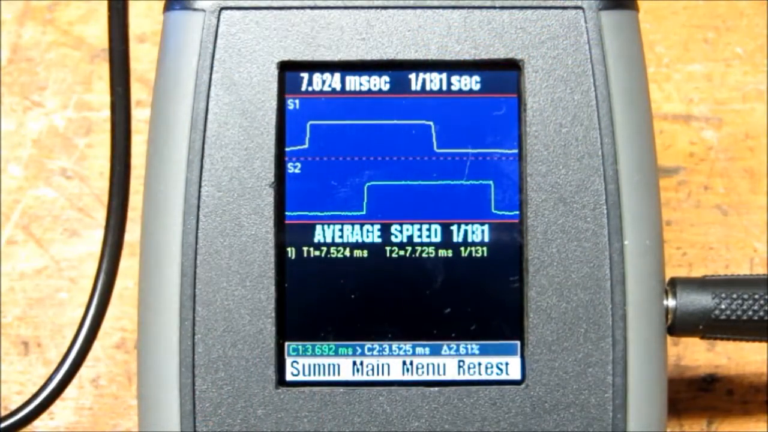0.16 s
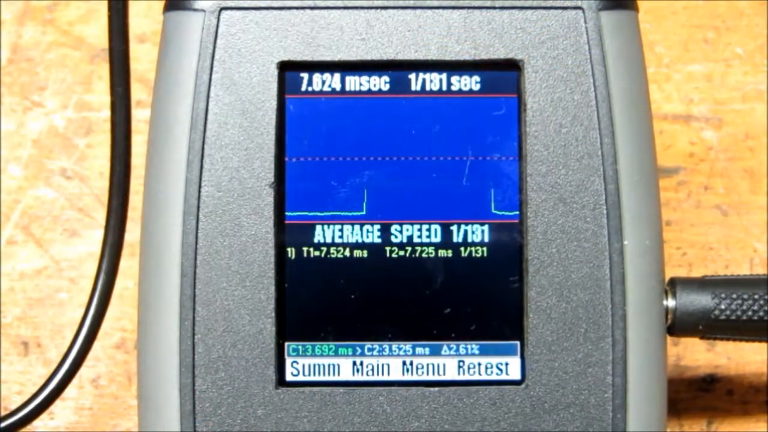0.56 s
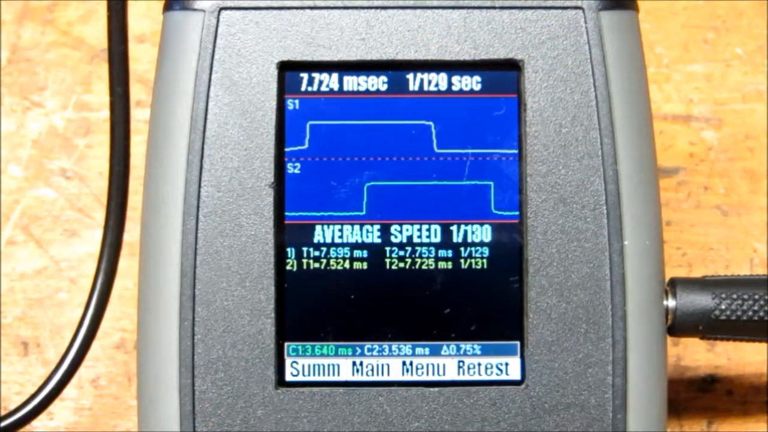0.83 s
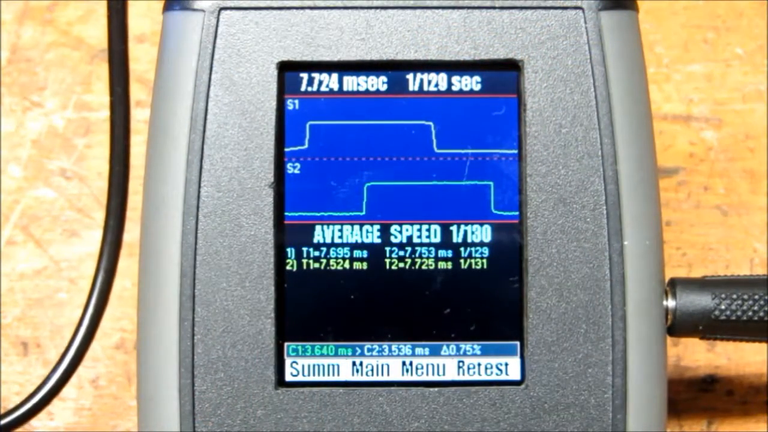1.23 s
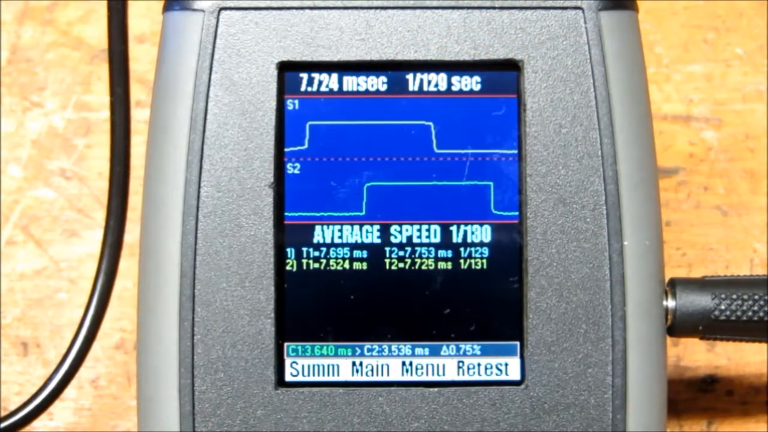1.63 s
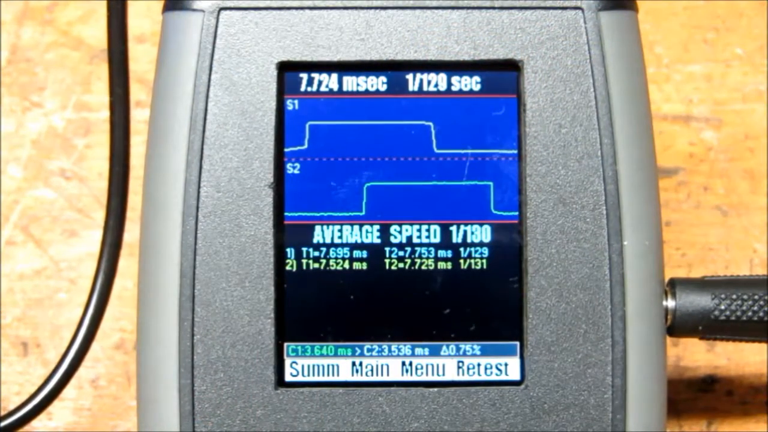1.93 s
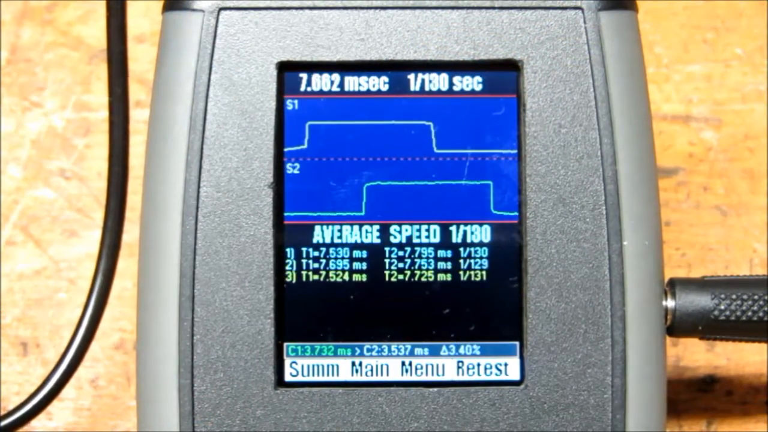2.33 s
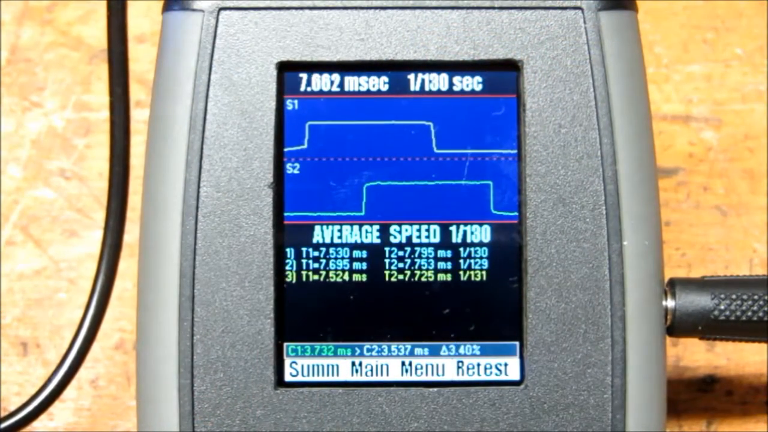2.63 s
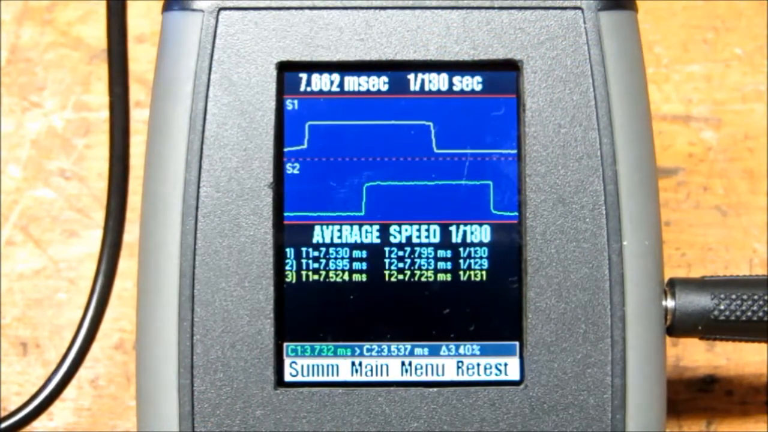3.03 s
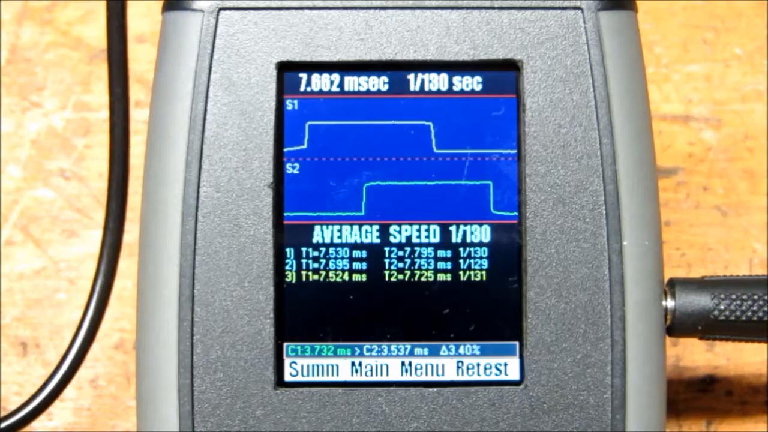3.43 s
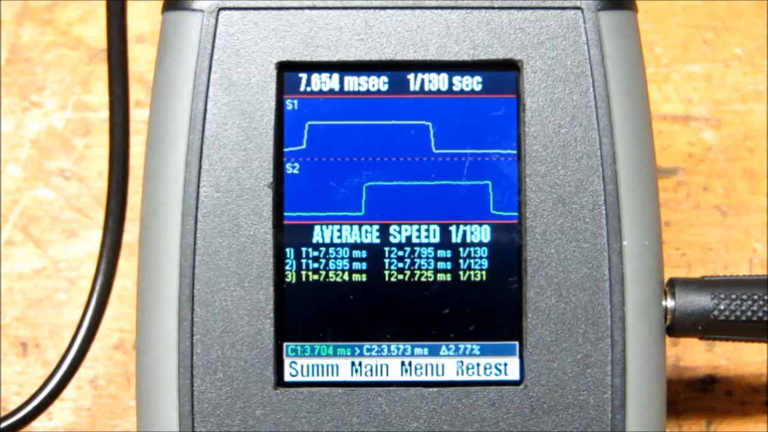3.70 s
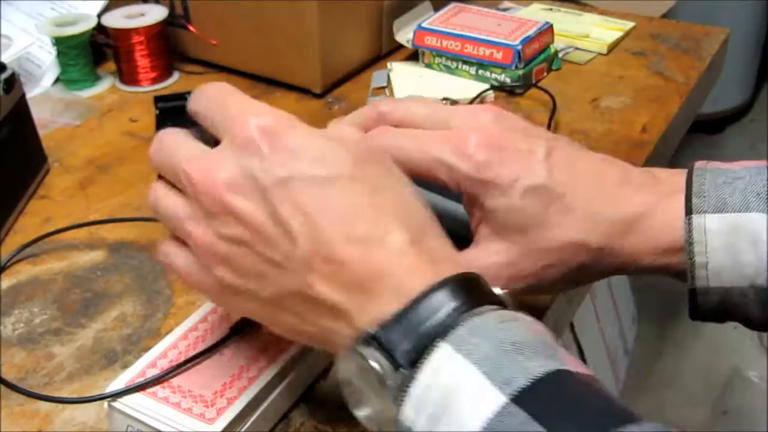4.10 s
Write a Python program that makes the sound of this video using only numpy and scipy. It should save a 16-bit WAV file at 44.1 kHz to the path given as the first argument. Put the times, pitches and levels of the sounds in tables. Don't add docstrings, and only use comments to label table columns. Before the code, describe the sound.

Three firings of a mechanical camera on a wooden workbench, about one and a half seconds apart. Each is a bright click, spring whirr and double clack, then a pause and a quick clicking wind. The lever springs home with a rattle after the first two. The third wind breaks off into brief hand rustle. Near microphone, short indoor reverberation.

```python
import sys
import numpy as np
from scipy import signal
from scipy.io import wavfile
from scipy.ndimage import uniform_filter1d

SR = 44100
rng = np.random.default_rng(int(sys.argv[2]) if len(sys.argv) > 2 else 0)


def amp(db):
    return 10 ** (np.asarray(db, float) / 20)


def write(x):
    x = np.atleast_2d(x).T
    wavfile.write(sys.argv[1], SR, np.round(np.clip(x, -1, 1) * 32767).astype(np.int16))


N = 187753


def evened(x):
    return x / np.sqrt(np.mean(x ** 2) + 1e-20)


def read_spectrum(points, hz):
    f, value = np.transpose(points)
    return np.interp(np.log(hz + 1), np.log(f + 1), value)


def level(curves):
    t = np.arange(N) / SR
    gain = np.zeros(N)
    for curve in curves:
        times, db = np.transpose(curve)
        gain += amp(np.interp(t, times, db, -200, -200))
    return gain


def colour(x, spectrum, modes=(), ring_db=0., shelf_db=0.):
    hz = abs(np.fft.fftfreq(4096, 1 / SR))
    humps = np.zeros(len(hz))
    for f_hz, width_hz, db in modes:
        humps += amp(db / 2) / (1 + (2 * (hz - f_hz) / width_hz) ** 2)
    slope_db = shelf_db * np.tanh(2 * np.log((hz + 1) / 3600))
    gain_db = read_spectrum(spectrum, hz) + ring_db * humps + slope_db
    log_gain = np.log(amp(np.maximum(gain_db, -100)))
    taps = np.fft.ifft(np.exp(np.conj(signal.hilbert(log_gain)))).real[:2048]
    return signal.oaconvolve(x, taps / np.linalg.norm(taps))[:N]


def band_noise(lo_hz, hi_hz, channels):
    band = signal.butter(2, [lo_hz, hi_hz], "bandpass", fs=SR)
    return evened(signal.lfilter(*band, rng.standard_normal((channels, N))))


def chatter(per_s, spread_db):
    hits = rng.standard_normal(N) * (rng.random(N) < per_s / SR)
    size_db = spread_db * np.minimum(rng.exponential(1, N), 4)
    return evened(hits * amp(size_db))


def blows(rows, spectrum, modes, low_modes, ring_db, bounce_db, bounce_ms, strike_db):
    low, high = np.zeros(N), np.zeros(N)
    u_ms = np.arange(-200, 4000) / SR * 1000
    grit = evened(rng.uniform(-1, 1, N))
    for s, db, tilt_db, rise_ms, t60_ms in rows:
        after_ms = np.maximum(u_ms - rise_ms, 0)
        buzz = amp(-60 * after_ms / max(t60_ms, 4))
        rattle = amp(bounce_db - 60 * after_ms / bounce_ms)
        rise = amp(-18 * np.maximum(1 - u_ms / max(rise_ms, .2), 0))
        start = round(s * SR) - 235
        at = slice(start, start + len(u_ms))
        force = grit[at] * (buzz + rattle) * rise
        force[np.argmax(u_ms >= .8 * rise_ms)] += amp(strike_db) / max(rise_ms, .5)
        low_share = 1 / np.sqrt(1 + amp(-2 * tilt_db))
        low[at] += amp(db) * low_share * force
        high[at] += amp(db) * np.sqrt(1 - low_share ** 2) * force
    low = colour(low, spectrum, modes + low_modes, ring_db, -23.5)
    return low + colour(high, spectrum, modes, ring_db, 8.7)


# f/Hz, level/dB
AIR_MID = [(15, -46), (25, -9), (125, -7.5), (181, -9.5), (427, -9), (543, -9), (927, -2.5), (1280, -7),
           (7090, -15.5), (7680, -13), (8320, -17), (15000, -27.5)]
AIR_SIDE = [(15, -38.5), (25, -9), (224, -6.5), (257, -11.5), (318, -3.5), (450, -8.5), (790, -3.5),
            (6540, -21.5), (8100, -23.5), (15000, -35)]
# f/Hz, left/dB, right/dB
WHISTLES = [(7867, -81, -66.5), (15734, -86, -71.5)]


def air():
    mid = amp(-61) * colour(rng.standard_normal(N), AIR_MID)
    side = amp(-51.5) * colour(rng.standard_normal(N), AIR_SIDE)
    stereo = np.array([mid + side, mid - side])
    t = np.arange(N) / SR
    for hz, left_db, right_db in WHISTLES:
        gain = np.sqrt(2) * amp(np.array([[left_db], [right_db]]))
        stereo += gain * np.sin(2 * np.pi * hz * t)
    return stereo


RELEASES = [
    .3595,
    1.8766,
    3.3287,
]
# t after release/s, level/dB, low over high/dB, rise/ms, t60/ms
FIRING = [
    (0, -14, -0.5, .8, 31.3),
    (.0723, -23, 0, 0.79, 45),
    (.0977, -11.5, 1.5, .8, 12),
    (.1118, -16.5, -6.5, .8, 12),
    (.1197, -14.5, -8, 1.6, 25),
    (.1245, -17.5, -2.5, .8, 25),
    (.1555, -22, 2, .6, 14),
]
# t/s, level/dB, low over high/dB, rise/ms, t60/ms
FINGERS = [(0.1518, -39.5, -7, 1.02, 33), (0.636, -55.5, 1, 0.71, 200), (0.669, -53.5, -10, 1.35, 12),
           (3.1164, -52.5, -1, 0.72, 18), (3.132, -46.5, -4, 0.88, 15), (3.6145, -52.5, -16, 1.3, 16),
           (3.6748, -44.5, 2.5, 0.75, 21), (3.755, -43.5, 0, 1.05, 5.5)]
# t after release/s, level/dB
RUNNING = [(-.003, -65), (.002, -23.5), (0.017, -28.5), (.07, -33), (.116, -33), (0.122, -21), (.15, -24),
           (0.164, -37), (0.225, -56)]
# f/Hz, level/dB
BODY = [(180, -64.5), (300, -18.5), (848, -10.5), (1740, -6), (2130, -1), (2930, 0.5), (3710, 0),
        (7020, -8.5), (14400, -17.5), (15700, -27), (16500, -36.5)]
# f/Hz, width/Hz, level/dB
BODY_MODES = [(2022, 300, 6.5), (3590, 680, -4.5), (3900, 90, -14), (4880, 130, 0.5), (5480, 51, -17.5),
              (6550, 26, -16), (7000, 110, 8), (7500, 22, -7.5), (9800, 59, -10.5), (10370, 31, -7),
              (10900, 68, 0.5), (12000, 66, -9)]
# f/Hz, width/Hz, level/dB
HOLLOW = [(1080, 240, -5)]


def shutter():
    firings = [(s + d, *rest) for s in RELEASES for d, *rest in FIRING]
    hits = blows(firings + FINGERS, BODY, BODY_MODES, HOLLOW, ring_db=4.14,
                 bounce_db=-15.0, bounce_ms=120.0, strike_db=15.74)
    running = level([[(s + d, db) for d, db in RUNNING] for s in RELEASES])
    whirr = running * chatter(per_s=22000, spread_db=1.0)
    return hits + colour(whirr, BODY, BODY_MODES, ring_db=2.3, shelf_db=6.4)


# f/Hz, t60/s
ROOM_T60 = [(300, 0.62), (1000, 0.33), (3000, 0.3), (8000, 0.17), (15000, 0.16)]


def room(x):
    size = SR // 2
    taps = np.zeros((2, size))
    at = np.arange(60, size - 20, 20) + rng.integers(0, 20, (2, (size - 61) // 20))
    np.put_along_axis(taps, at, rng.choice([-1., 1.], at.shape), 1)
    hz, t, z = signal.stft(taps, SR, nperseg=256)
    decay = amp(-60 * t / read_spectrum(ROOM_T60, hz)[:, None])
    tail = signal.istft(z * decay, SR, nperseg=256)[1][:, :size]
    return signal.fftconvolve(x[None], tail / np.linalg.norm(tail[0]), axes=1)[:, :N]


# t/s, level/dB, f/Hz, t60/s
KNOCKS = [(.635, -57.5, 270, 0.12), (1.25, -57, 105.5, 0.23), (2.366, -51.5, 324, 0.14),
          (2.73, -60, 95, 0.28), (2.74, -56, 320, 0.11), (2.9, -59, 60.2, .15), (3.89, -52, 320, .13),
          (4.1, -58, 91, .22), (4.2, -56, 110, 0.25)]
# t after release/s, level/dB, f/Hz, t60/s
MIRROR_KNOCK = (0.1, -50, 96, .47)
# t after release/s, level/dB
THUD = [(.06, -69.5), (0.099, -47.5), (.13, -54), (.165, -56.5), (.22, -95)]


def bench(camera):
    t = np.arange(N) / SR
    modes = np.zeros(N)
    delay_s, *ring = MIRROR_KNOCK
    for s, db, hz, t60 in KNOCKS + [(s + delay_s, *ring) for s in RELEASES]:
        u = np.maximum(t - s, 0)
        envelope = amp(db - 60 * u / t60) * (1 - np.exp(-u * hz / 1.2))
        modes += envelope * np.sin(2 * np.pi * hz * u)
    weight = level([[(s + d, db) for d, db in THUD] for s in RELEASES])
    lever_weight = level([[(row[2] - .11 + d, db) for d, db in THUD] for row in RETURNS])
    weight += amp(-4) * lever_weight
    thud = weight * band_noise(280, 800, channels=1)
    thud = thud + amp(-10.5) * weight * band_noise(35, 150, channels=1)
    effort = abs(uniform_filter1d(camera ** 2, 3000)) ** 0.24
    rumble = amp(-52.0) * effort * band_noise(25, 420, channels=2)
    return modes * np.array([[1.7], [.4]]), rumble + thud * np.array([[1.3], [.7]])


def teeth_times(stroke, teeth):
    s, angle = np.transpose(stroke)
    passed = [k for k in teeth if angle[0] <= k <= angle[-1]]
    return zip(np.interp(passed, angle, s), passed)


# t/s, teeth passed
STROKES = [
    [(.9138, 0), (.9993, 5), (1.0192, 7), (1.0735, 10), (1.1001, 12), (1.123, 14), (1.153, 17),
     (1.2056, 22), (1.26, 27)],
    [(2.4385, 2), (2.4921, 6), (2.5025, 7), (2.5439, 9), (2.5625, 10), (2.5883, 12), (2.641, 17),
     (2.684, 22), (2.7245, 26)],
    [(3.9442, 2), (3.972, 3), (4.0145, 6), (4.0232, 7), (4.0415, 8), (4.06, 9)],
]
STROKE_DB = [0.5, -1, -0.5]
LARGE_TEETH = [7, 9.35, 12, 14.55, 17, 19.6, 22]
# t/s, level/dB, low over high/dB, t60/ms
CATCHES = [(0.8376, -11.5, -6.5, 3.5), (0.8548, -21, -5.5, 3.1), (0.8626, -40, 13, 12),
           (0.9054, -39, -5, 23), (1.2146, -15, -4.5, 6.8), (2.3652, -14.5, -4.5, 13.8),
           (2.3882, -29, 0.5, 11), (2.395, -36, -11, 14), (2.4, -36.5, -11, 18), (2.406, -40, -7.5, 15),
           (2.443, -38.5, -3, 30), (2.694, -21.5, -2.5, 14.95), (2.7286, -30.5, -7, 8),
           (3.8905, -13, -5.5, 5.5), (3.91, -35.5, -6, 24), (3.914, -36, -6, 12), (3.9225, -38, -9, 23)]
# teeth passed, level/dB
LOAD = [(0, -53.5), (7, -47), (12, -48), (21, -43), (25, -37.5), (27, -40)]
# f/Hz, level/dB
GEARS = [(180, -65), (300, -19), (607, -17), (848, -24), (1550, -12.5), (2320, -3), (3530, -0.5),
         (6140, -2), (15200, -16.5), (16500, -33)]
# f/Hz, width/Hz, level/dB
GEAR_MODES = [(1463, 37, -5), (2610, 130, -21), (3590, 560, -11), (5540, 21, -21), (6320, 207, 1),
              (7220, 510, -3.5), (7600, 19, -15), (9500, 100, -13.5), (11000, 400, 4), (13700, 250, -19)]
# f/Hz, width/Hz, level/dB
LEVER_ARM = [(1083, 150, 4), (786, 150, -6.5)]


def winding():
    tooth_db, tooth_tilt_db, tooth_t60_ms = -33.8, -13, 18
    tooth_scatter_db, tilt_scatter_db = 2.5, 4.5
    large_db, large_db_per_tooth = -27, 0.233
    large_tilt_db, large_t60_ms = -12.5, 17.4
    pawl_hz, pawl_t60_s, pawl_db = 3500, .015, -5
    slack_s, slack_db, coast_s, coast_db = .04, -69, 0.029, -61
    rows = [(s, db, tilt, 1.1, t60) for s, db, tilt, t60 in CATCHES]
    large, drags = np.zeros(N), []
    small_teeth = sorted(set(range(30)) - set(LARGE_TEETH))
    for stroke, force_db in zip(STROKES, STROKE_DB):
        wear = rng.standard_normal((30, 2))
        for s, k in teeth_times(stroke, small_teeth):
            db = force_db + tooth_db + tooth_scatter_db * wear[k, 0]
            tilt_db = tooth_tilt_db + tilt_scatter_db * wear[k, 1]
            rows.append((s, db, tilt_db, 1.1, tooth_t60_ms))
        for s, k in teeth_times(stroke, LARGE_TEETH):
            db = force_db + large_db + large_db_per_tooth * (k - LARGE_TEETH[0])
            rows.append((s, db, large_tilt_db, 1.4, large_t60_ms))
            large[round(s * SR)] = amp(db + 3.8 * wear[round(k) + 1, 1])
        load = [(s, force_db + np.interp(k, *np.transpose(LOAD))) for s, k in stroke]
        slack = (load[0][0] - slack_s, slack_db)
        coast = (load[-1][0] + coast_s, coast_db)
        drags.append([slack] + load + [coast])
    clicks = blows(rows, GEARS, GEAR_MODES, LEVER_ARM, ring_db=5.9,
                   bounce_db=-13.5, bounce_ms=59.6, strike_db=7.6)
    u = np.arange(2000) / SR
    envelope = amp(pawl_db - 60 * u / pawl_t60_s) * (1 - np.exp(-u / 0.00028))
    ring = envelope * np.sin(2 * np.pi * pawl_hz * u)
    grind = level(drags) * chatter(per_s=5500, spread_db=3.2)
    drag = colour(grind, GEARS, GEAR_MODES, ring_db=3.6, shelf_db=-3.1)
    return clicks + 2 * signal.oaconvolve(large, ring)[:N] + drag


# thumb lifts t/s, scrape starts t/s, stop t/s, lift level/dB, scrape level/dB
RETURNS = [
    (1.404, 1.435, 1.4615, -36, -22.5),
    (2.874, 2.886, 2.911, -32, -21.5),
]
# t/s, level/dB, low over high/dB, rise/ms, t60/ms
LEVER_BACK = [(1.4102, -23, -3.5, 2.5, 28), (1.4374, -18.5, -6, 1.71, 8), (1.4529, -20.5, -14, 3.2, 12),
              (1.4615, -8.5, -7, 1.06, 14), (1.4719, -11.5, -5, 0.74, 14), (1.4785, -24, 3, 3.4, 54),
              (2.8632, -34, -3.5, 2.25, 7.8), (2.8769, -23, -1.5, 1.2, 24), (2.911, -8.5, -7, 1.32, 17.7),
              (2.9194, -9, -3.5, .9, 8.1), (2.9275, -16.5, 1, 1, 16)]
# f/Hz, level/dB
LEVER = [(180, -67), (300, -26), (587, -23), (1170, -10.5), (1720, -10.5), (1930, -3.5), (3530, 0),
         (13700, -15), (15700, -21), (16500, -29)]
# f/Hz, width/Hz, level/dB
LEVER_MODES = [(2120, 400, 3.5), (3480, 220, 4), (4820, 190, -7), (5930, 140, -10), (6550, 240, -1.5),
               (8460, 200, -14), (8350, 86, -10), (9560, 17, -11), (12400, 110, -19)]
# f/Hz, level/dB, t60/s
ARM_RING = [(1130, -38, .13), (1030, -41.5, .16)]


def lever_back():
    rest_s = .008
    t = np.arange(N) / SR
    slides, ring = [], np.zeros(N)
    for lift, start, stop, lift_db, db in RETURNS:
        slides.append([(lift - .006, -56), (lift, lift_db),
                       (start, lift_db - 5.5), (start + .005, db), (stop - .002, db + 0.3),
                       (stop + rest_s, db - 8.5), (stop + 0.023, db - 8), (stop + 0.024, -56)])
        u = np.maximum(t - stop - rest_s, 0)
        for hz, ring_db, t60 in ARM_RING:
            ring += amp(ring_db - 60 * u / t60) * np.sin(2 * np.pi * hz * u)
    scrape = level(slides) * chatter(per_s=18000, spread_db=0.64)
    scrape = colour(scrape, LEVER, LEVER_MODES, ring_db=5.75, shelf_db=2.1)
    hits = blows(LEVER_BACK, LEVER, LEVER_MODES, HOLLOW, ring_db=3.99,
                 bounce_db=-22.5, bounce_ms=50., strike_db=13.2)
    return hits + scrape + ring


# t/s, level/dB
RUSTLE = [(4.09, -42), (4.102, -45), (4.154, -53.5), (4.168, -41), (4.218, -53.5), (4.257, -48.5)]
# t/s, level/dB, length/s
PALMS = [(4.115, -55, .018), (4.165, -61, .025), (4.222, -51.5, 0.026)]
# f/Hz, level/dB
CLOTH = [(1180, -44), (2000, -1), (5940, -5), (9110, -9.5), (9840, -6.5), (14900, -30), (15500, -23)]


def hands():
    t = np.arange(N) / SR
    speed = level([RUSTLE])
    hiss = np.array([colour(chatter(14000, 2.6), CLOTH) for _ in range(3)])
    high = amp(-5.5) * speed * (1.1 * hiss[0] + hiss[1:])
    rub = band_noise(620, 3100, channels=2)
    wide = np.array([rub[0] + 0.73 * rub[1], rub[0] - 0.6 * rub[1]])
    rubbing = amp(-53.5) * (speed > amp(-100)) * (speed / amp(-48)) ** 0.24
    closing = sum(amp(db) * np.exp(-((t - s) / length) ** 2) for s, db, length in PALMS)
    return high + rubbing * wide + closing * band_noise(302, 460, channels=2)


# t/s, level/dB
CUT = [(0, -1), (4.055, -0.5), (4.058, -26), (4.07, -64), (4.086, -38), (4.089, 1.5), (4.252, 4),
       (4.2574, -30)]


def scene():
    camera = shutter() + winding() + lever_back()
    camera = signal.sosfilt(signal.butter(8, 810, "highpass", fs=SR, output="sos"), camera)
    lean = 0.25 * signal.lfilter(*signal.butter(1, 5000, fs=SR), camera)
    bright = signal.lfilter(*signal.butter(1, 11000, "highpass", fs=SR), camera)
    lean += amp(-2.0) * bright * band_noise(40, 400, channels=1)[0]
    knocks, rumble = bench(camera)
    direct = np.array([camera + lean, camera - lean])
    first = direct + amp(-14) * room(camera) + rumble
    before_cut = np.arange(N) < 4.088 * SR
    return (first * before_cut + air()) * level([CUT]) + knocks + hands()


def top_cut(x):
    return signal.sosfilt(signal.butter(12, 16850, fs=SR, output="sos"), x)


# from t/s, to t/s, depth/dB
HOLES = [
    (0.35, 0.357, -23),
    (1.864, 1.872, -32),
    (2.354, 2.357, -12),
    (3.316, 3.322, -19),
]


def record(dry):
    t = np.arange(N) / SR
    hole_db = sum(db * ((t > a) & (t < b)) for a, b, db in HOLES)
    held = dry * amp(uniform_filter1d(1. * hole_db, 90))
    edge = signal.firwin(511, 16050, window=("kaiser", 8), fs=SR)
    mix = signal.oaconvolve(held, edge[None], "same")
    return top_cut(np.clip(mix, -1, 1))


dry = scene()
out = record(dry)
write(out)
```